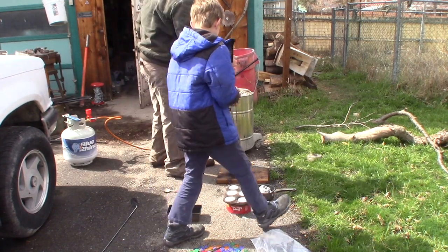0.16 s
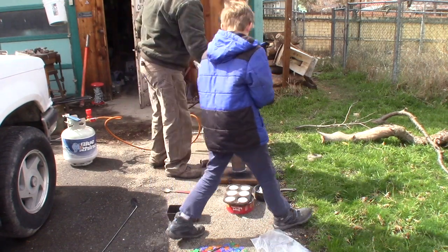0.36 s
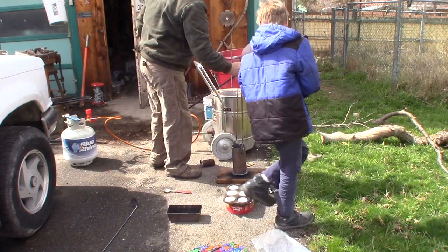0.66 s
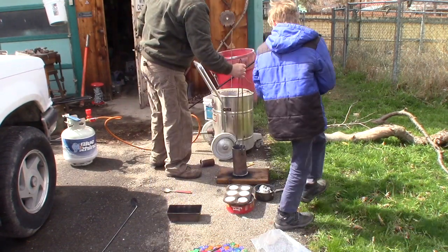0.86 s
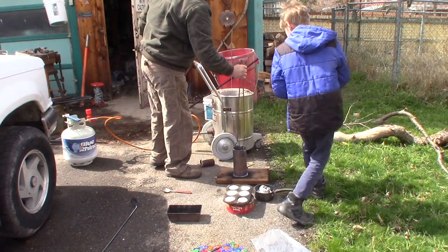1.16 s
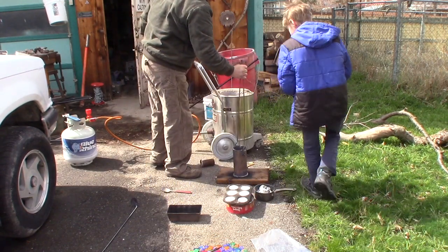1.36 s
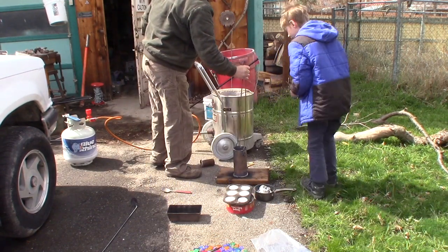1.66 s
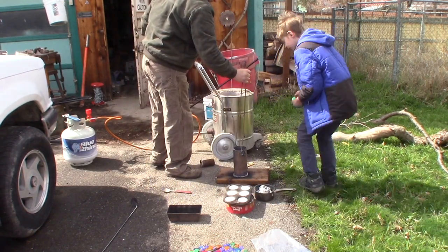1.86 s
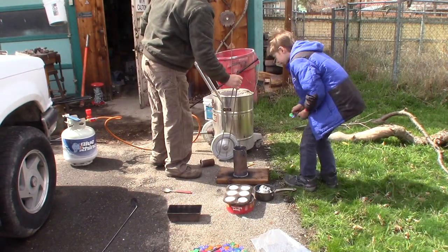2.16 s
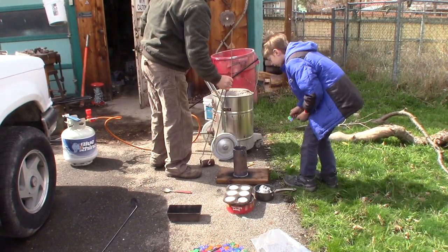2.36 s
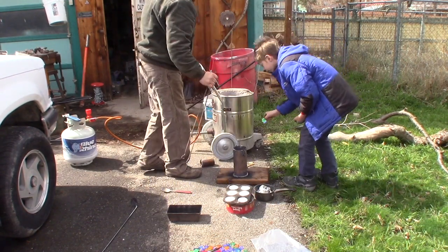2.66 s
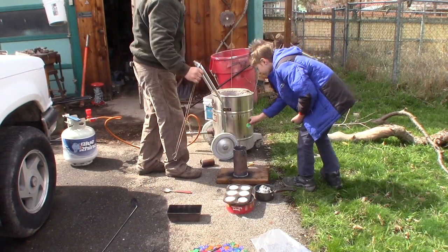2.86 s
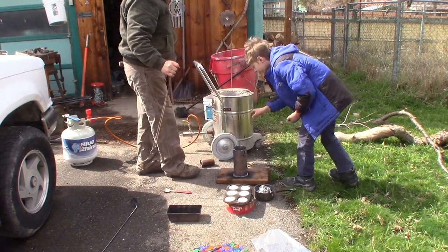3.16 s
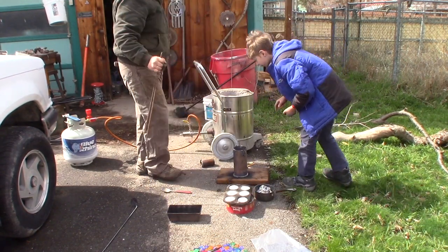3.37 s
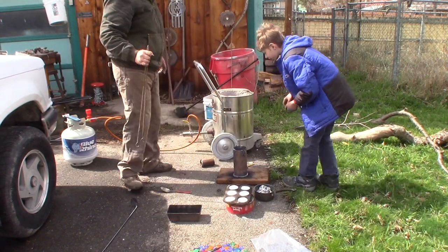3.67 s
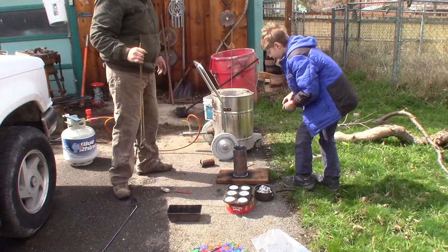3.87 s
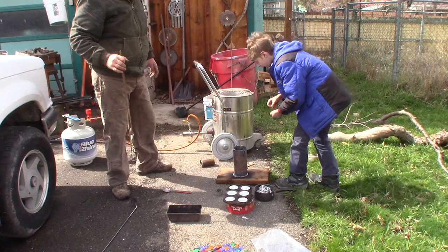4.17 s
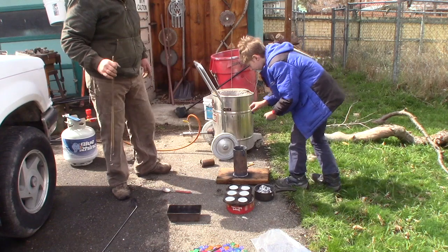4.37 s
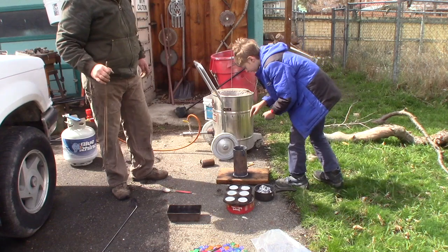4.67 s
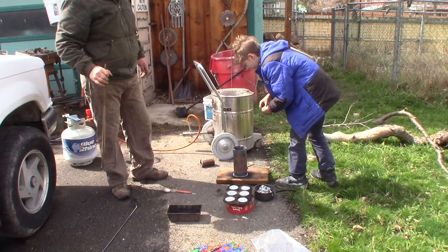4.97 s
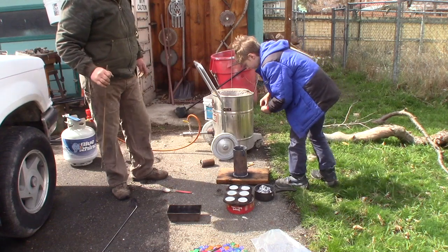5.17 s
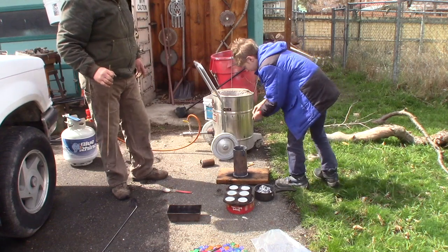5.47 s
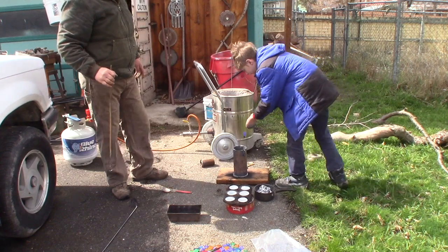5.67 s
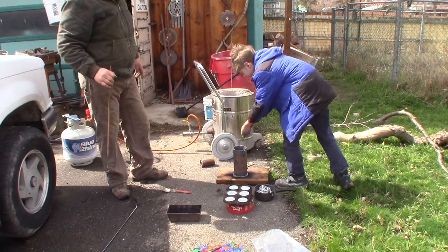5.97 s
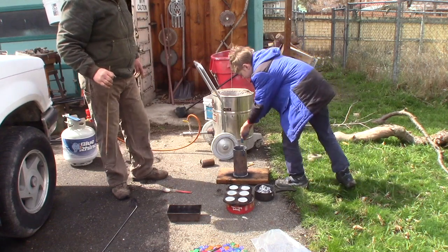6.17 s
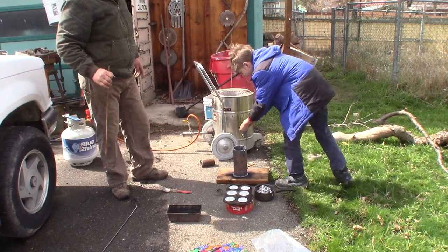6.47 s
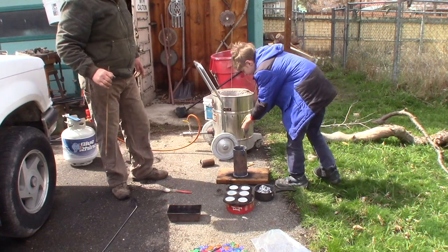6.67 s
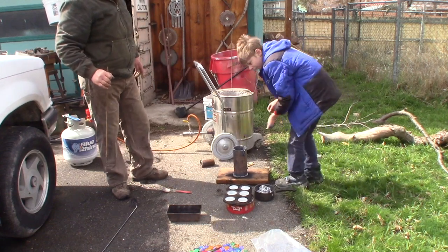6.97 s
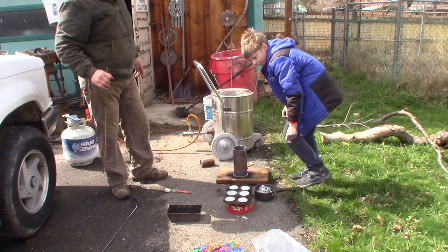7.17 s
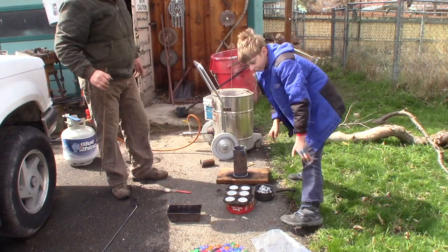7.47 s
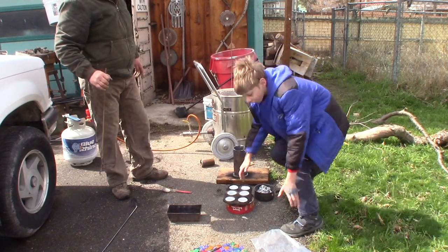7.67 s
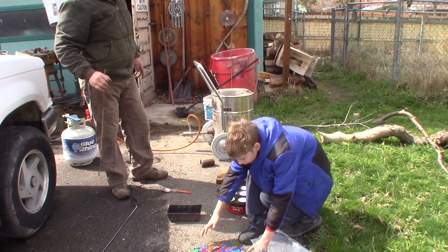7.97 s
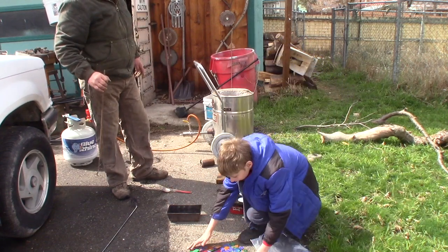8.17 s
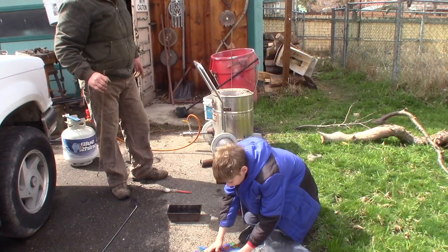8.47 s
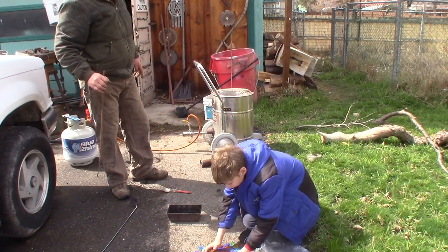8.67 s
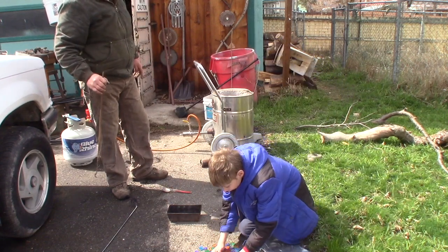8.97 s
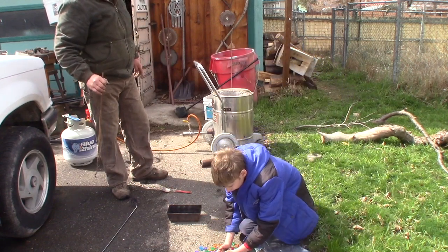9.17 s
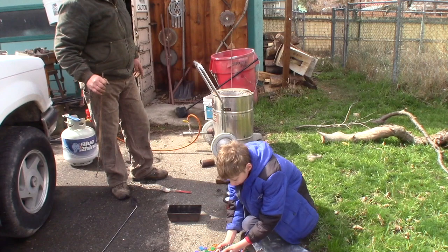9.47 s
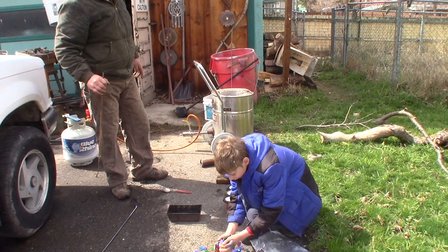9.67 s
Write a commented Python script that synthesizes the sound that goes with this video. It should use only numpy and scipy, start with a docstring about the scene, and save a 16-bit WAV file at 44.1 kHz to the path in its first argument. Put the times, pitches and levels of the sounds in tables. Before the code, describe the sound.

A gas furnace roars low and steady outdoors while shoes scuff, a tin is knocked, and a hand rummages through jingling metal scraps.

```python
"""A steady roar is heard first: turbulent gas burning in a small melting furnace in a yard, coloured by
the resonances of the drum. Nearby, shoes and a jacket scuff by friction, and small metal scraps clink
as impacts excite their modes. A baking tin is knocked and dragged. Finally a hand rummages through
a heap of scraps close by, so loudly that an automatic gain control turns the whole sound down."""
import sys
import numpy as np
from scipy import signal
from scipy.fft import rfft, irfft, next_fast_len
from scipy.io import wavfile
from scipy.ndimage import uniform_filter1d

SR = 44100
rng = np.random.default_rng(int(sys.argv[2]) if len(sys.argv) > 2 else 0)


def transcribe(u):
    """Save the signal u as a 16-bit wav file named by the first command-line argument.

    u: samples, shape (n,) or (channels, n), limited to [-1, 1]; the rate is SR.
    q: integer samples, one column per channel.
    """
    v = np.clip(np.atleast_2d(u).T, -1, 1)
    q = np.round(v * 32767).astype(np.int16)
    wavfile.write(sys.argv[1], SR, q)


N = 432641


def flame():
    """Combustion noise: turbulent burning radiates a broad roar, filtered by the furnace cavity."""
    # spectrum of the roar: f/Hz, density/dB
    roar = [(15, -89), (25, -64), (52, -31), (123, -4.5), (242, -0.5), (354, -13), (394, -11), (439, -15.5),
            (863, -22), (1040, -31), (1840, -37.5), (2280, -39), (4740, -44), (8360, -48), (16000, -61)]
    # drum resonances and gas-jet whistles: f/Hz, width/Hz, lift/dB (negative: a notch between modes)
    resonances = [(67, 10, 7.5), (202, 10, 6), (218, 7, 4), (231, 7, -9), (248, 11, 8.5), (277, 12, 4),
                  (297, 7, -4), (307, 6, 7), (328, 24, 3), (375, 10, 3), (409, 7, 8), (420, 7, -5),
                  (467, 6, -4), (478, 6, 7), (540, 14, 3), (605, 44, 2), (841, 13, -3), (958, 26, 4.5),
                  (1356, 103, 6), (2370, 230, 4), (3235, 110, 5), (3750, 105, 7.5), (7400, 270, 7),
                  (8560, 150, 6), (12700, 450, 6)]
    # likeness of left and right: f/Hz, coherence
    coherence = [(60, 0.97), (180, 1), (550, 1), (1650, 0.91), (4970, 0.95), (15000, 1)]
    # balance: f/Hz, left minus right/dB
    balance = [(60, 1.5), (180, 1.4), (550, 1.6), (1650, 1.0), (4970, 0.46), (15000, 0.5)]
    # slow swell of the roar around 500 Hz: t/s, level/dB
    swell = [(0, 0), (1.2, -0.5), (2.1, 1), (2.8, 2), (3.6, 2.5), (4.4, 0), (5.6, -1.5), (7, -0.5)]
    rms_db, hop = -23.5, 2048
    frames, hz = N // hop + 5, np.fft.rfftfreq(4 * hop, 1 / SR)
    left_re, left_im, other_re, other_im, patches, flicker = rng.standard_normal((frames, len(hz), 6)).T
    patches = evened(uniform_filter1d(uniform_filter1d(patches, 12, 0), 7, 1))  # narrow bands linger
    flicker = evened(uniform_filter1d(flicker, 1200, 0))
    waver = evened(uniform_filter1d(uniform_filter1d(left_re, 80, 0), 8, 1))  # resonances come and go
    middle = np.exp(-np.log2((hz + 1) / 500) ** 2)[:, None]
    swell_db = middle * np.interp(np.arange(frames) * hop / SR, *np.transpose(swell))
    lift_db = sum(db / (1 + (2 * (hz - f) / width) ** 2) for f, width, db in resonances)[:, None]
    level_db = read(roar, hz)[:, None] + lift_db * (1 + .15 * waver)
    level_db += .8 * patches + .25 * flicker + swell_db
    alike, lean = read(coherence, hz)[:, None], amp(read(balance, hz) / 2)[:, None]
    left = left_re + 1j * left_im
    right = alike * left + np.sqrt(1 - alike ** 2) * (other_re + 1j * other_im)
    spectra = np.array([left * lean, right / lean]) * amp(level_db)
    return amp(rms_db) * evened(signal.istft(spectra, nperseg=4 * hop, noverlap=3 * hop)[1][:, :N])


def scraps():
    """Impact noise: dense collisions in a stirred heap merge into a rattle; some pieces ring out."""
    # modes of the scraps: f/Hz, width/Hz, level/dB
    modes = [(3610, 30, -7), (3780, 30, -6), (4245, 14, -2), (4500, 8, -6), (5000, 10, -8), (5640, 7, 1),
             (6330, 10, -6), (7000, 14, -4), (7165, 14, -4), (7680, 9, 0), (9190, 11, -6), (9450, 14, -5),
             (10320, 10, 0), (11300, 14, -6), (12100, 8, -5), (13300, 16, -9), (15400, 14, -12)]
    # strikes: t/s, crack/dB, first and second ringing pitch f/Hz, ring/dB, factor of damping by the hand
    clinks = [(3.2288, -22, 5640, 7680, -35, 3.4), (5.609, -33, 5640, 5640, -46, 0.62),
              (5.65, -33, 12100, 7680, -41, 0.71), (5.689, -28.5, 5640, 10300, -46, 1),
              (6.148, -24, 5640, 11300, -28, 3.6), (6.208, -42, 4540, 7680, -28, 0.59),
              (6.222, -40, 9250, 5641, -30, 0.6), (6.238, -36, 11300, 5000, -31, .8),
              (6.349, -12, 11300, 7560, -17, 3), (6.351, -30, 3780, 3780, -21, 1.4),
              (6.363, -17, 7680, 3780, -19, 1), (6.377, -18, 3780, 3610, -13, 1.1),
              (6.384, -6, 3800, 10300, -10, 2.6), (6.43, -30, 5641, 5641, -34, 1.5),
              (6.455, -6, 12100, 5641, -22, 2.5), (6.481, -3.5, 7680, 5641, -13.5, 1.8),
              (6.483, -34, 12100, 12100, -23, 2), (6.546, -26, 3610, 5640, -38, 1.7),
              (6.615, -40, 7770, 5640, -36, 2.5), (6.678, -19, 5641, 7680, -13, 4.2),
              (6.715, -29, 10350, 12100, -29, 1.6), (6.730, -17, 10300, 10300, -14, 2.1),
              (8.136, -13, 7440, 10300, -33, 4.2), (8.1506, -19, 7680, 7680, -35, 3),
              (8.197, -18, 7680, 10300, -13, 3.4), (8.225, -22, 10300, 10240, -13, 1.5),
              (8.263, -8, 7710, 10300, -14, 2), (8.3856, -8, 7680, 10350, -14, 2.4),
              (8.57, -16, 7680, 5641, -13, 1.4), (8.685, -12, 7200, 7200, 2, 2.9),
              (8.75, 1, 4245, 7680, -5, 4.7), (8.794, 1, 13300, 4245, -2.5, 3.3),
              (8.81, -18, 9450, 11300, 1, 1.9), (8.861, 3, 7680, 10300, -3, 3.8),
              (8.91, -5, 7000, 10300, -10, 2), (8.933, 5, 7680, 9190, -8, 3),
              (8.98, 6.5, 10400, 7100, -8, 3.5), (9.028, -6, 10300, 7680, -8, 2),
              (9.196, 9.5, 7600, 9000, -4, 1.7), (9.371, -7, 7000, 7680, -11, 3),
              (9.418, 0, 10300, 10300, -10, 3.1), (9.455, -2, 7680, 10570, -3, 2.2),
              (9.495, -24, 7680, 5641, -12, 1.6), (9.563, -15.5, 6750, 10300, -5, 6.4),
              (9.64, -13, 6900, 10300, -7, 2.6), (9.653, -17.5, 10320, 5641, -14, 0.83),
              (9.672, -15, 7680, 10300, -2.5, 1.63), (9.71, -31, 6230, 10400, 1.5, 4.7),
              (9.7875, -8, 7680, 5641, -8.5, 1.5)]
    # hand strokes: peak t/s, level/dB, swell/s, fade/s, relative level of heavier pieces/dB
    stirs = [(6.15, -34.5, 0.053, 0.057, -8), (6.24, -31.5, 0.1, 0.063, -32),
             (6.39, -23.5, 0.034, 0.067, -2), (6.5, -41, 0.034, 0.076, -5), (6.68, -26, 0.0026, 0.015, -8),
             (6.732, -29.5, 0.021, 0.03, -4), (8.28, -24, 0.17, 0.26, -7), (8.44, -12, 0.13, 0.48, -9),
             (8.57, -7.5, 0.16, 0.15, -18), (8.68, -13.5, 0.082, 0.045, -12),
             (8.81, -14, 0.16, 0.14, -16.5), (8.98, -10.5, 0.18, 0.23, -10.5),
             (9.2, -9.5, 0.12, 0.13, -8.5), (9.33, -16.5, 0.11, 0.25, -8.5), (9.46, -16, 0.06, 0.15, -10),
             (9.56, -23.5, 0.097, 0.087, -7.5), (9.69, -18, 0.14, 0.11, -20), (9.8, -12, 0.009, .05, -25)]
    # light pieces rattling, with the microphone's colouring in the top treble: f/Hz, density/dB
    rattle = [(2060, -25), (3500, -16), (5300, -9), (6100, -6), (7400, 0), (8200, -4), (10300, -2),
              (12000, -10), (13600, -19), (14600, -24), (15600, -21), (16500, -24)]
    # spectrum of heavier pieces sliding: f/Hz, density/dB
    slide = [(470, -47), (800, -14), (846, -24), (987, -15), (1810, -15.5), (5280, -4), (5500, -9.5),
             (7150, -43), (12100, -120)]
    slips = amp(2.2 * evened(uniform_filter1d(rng.standard_normal(N), 300)))  # contacts come in bunches
    stir = strokes(stirs)
    heavy = strokes([(s, db + heavy_db, swell, fade) for s, db, swell, fade, heavy_db in stirs])
    out = stir * slips * coloured(crackle(per_s=2000, spread_db=2.2, hiss=.6), rattle)
    out += heavy * slips * coloured(crackle(per_s=1500, spread_db=2.4, hiss=.8), slide)
    out += amp(-8) * chimes(modes, stir, per_s=45, damping=3.5)
    commonest = [(hz, width, db) for hz, width, db in modes if db >= 0]  # touched most often
    out += amp(-11) * chimes(commonest, stir, per_s=110, damping=3)
    return out + blows(clinks, modes, t60=.017, crack_octaves=1, ring_octaves=.042,
                       second_db=2.5, floor_db=-19)


def tin():
    """Plate vibration: blows excite the tin's bending modes; dragged, it scrapes and chatters."""
    # modes of the tin: f/Hz, width/Hz, level/dB
    modes = [(409, 35, -1), (590, 40, -3), (850, 45, 0), (1000, 40, -3), (1197, 13, 2), (1553, 30, -6),
             (1810, 35, -9), (2150, 35, -6), (2770, 32, -8), (3130, 45, -8), (3880, 30, -11),
             (4180, 40, -11), (4930, 30, -12), (5110, 45, -11), (6370, 60, -14)]
    # blows: t/s, crack/dB, first and second ringing pitch f/Hz, ring/dB, damping factor
    knocks = [(7.729, -11, 940, 2140, -12.5, 0.88), (7.736, -18, 1200, 5110, -11, 0.94),
              (7.754, -27, 420, 3170, -8, 1.5), (7.767, -30, 860, 3880, -21, 1.3),
              (7.783, -19, 2770, 2770, -11, 1.1), (7.797, -8, 830, 3150, 5, 4.3),
              (7.824, -10.5, 3130, 5110, -10, 1.3), (7.889, -32, 690, 4230, -11.5, 2.2),
              (7.903, -16, 1180, 3130, -7.5, 1.2), (7.914, -9, 700, 1197, -4.5, 1),
              (7.947, -12, 494, 1553, -13.5, 2)]
    # drags over the ground: peak t/s, level/dB, swell/s, fade/s
    drags = [(7.732, -7, 0.0055, 0.15), (7.82, -11, 0.099, 0.049), (7.893, -7, .008, 0.091)]
    # spectrum of the scrape: f/Hz, density/dB
    friction = [(180, -52), (300, -0.5), (1100, -3), (1200, -26), (2350, -31), (3090, -20.5), (14000, -40)]
    drag = strokes(drags)
    scrape = amp(-8) * drag * coloured(crackle(per_s=300, spread_db=4, hiss=.5), friction)
    chatter = amp(-12) * chimes(modes, drag, per_s=130, damping=2.5)
    struck = blows(knocks, modes, t60=.03, crack_octaves=1.6, ring_octaves=.25,
                   second_db=-1.5, floor_db=-18)
    return struck + scrape + chatter


def scuffs():
    """Friction noise: rubbing cloth hisses, grit under the shoes crunches lower, single grains tick."""
    # movements of shoes and cloth: peak t/s, level/dB, length/s, relative drive of the grit/dB
    moves = [(0.036, -59, 0.092, 15.5), (0.234, -55.5, 0.14, 7.5), (0.453, -55, 0.21, 6),
             (0.76, -36.5, .11, -6.5), (1.193, -54.5, 0.54, -2), (1.653, -51, .14, -6), (1.84, -51, 0.4, 4),
             (1.909, -41.5, 0.046, 3), (2.026, -43.5, 0.066, -3.5), (3.234, -43, 0.06, -3),
             (3.485, -49.5, 0.25, 2.5), (3.87, -55.5, 0.55, 0.5), (4.103, -46.5, 0.19, -25),
             (5.958, -49, 0.22, -30), (6.99, -53.5, 0.83, -5), (7.613, -44.5, 0.37, -13)]
    # spectrum of rubbing cloth: f/Hz, density/dB
    cloth = [(1470, -25), (2500, -7), (4910, -13), (6350, -11), (6920, -10), (10200, -15.5), (16000, -43)]
    # spectrum of crunching grit: f/Hz, density/dB
    grit = [(350, -30), (600, 9), (1720, -1), (1940, -17), (2890, -14), (4000, -7), (5200, -26),
            (8800, -120)]
    # dry ticks of grit and tools: t/s, level/dB, f/Hz, thud/dB
    ticks = [(0.0225, -35, 2320, -33), (0.0862, -21.5, 6900, -34), (0.2998, -22, 1990, -48),
             (0.843, -30, 4000, -43), (1.068, -34, 3000, -38), (1.1328, -32.5, 4650, -35),
             (1.2286, -32, 4200, -43), (1.527, -35, 6500, -45), (1.8724, -23.5, 4300, -40),
             (1.8946, -22, 3250, -18), (2.0198, -31, 4760, -35), (2.068, -36, 3000, -30),
             (2.768, -33, 2490, -25), (3.7314, -31, 6100, -39), (3.861, -27, 6500, -34),
             (4.6032, -26.5, 2500, -12), (4.617, -32, 3710, -18), (4.6514, -30.5, 2300, -37),
             (4.6952, -13.5, 6100, -27), (4.716, -21, 7460, -48), (5.1071, -23.5, 8240, -45),
             (5.219, -27, 8190, -40), (5.432, -30, 8450, -45), (5.8439, -22, 4340, -26),
             (5.9229, -13, 7850, -20.5), (6.349, -17.5, 3880, -38), (6.3824, -15, 3900, -8.5),
             (6.714, -9.5, 4900, -25), (7.5646, -43, 5260, -18), (7.58, -28, 2260, -17.5),
             (8.0352, -16, 2440, -25), (8.083, -22, 6940, -27)]
    rub, crunch = np.zeros((2, N + SR))  # a second of lead lets a stroke begin before t = 0
    for s, db, length, grit_db in moves:
        stroke = amp(db) * np.hanning(round(length * SR))
        add(rub, s + 1 - length / 2, stroke)
        add(crunch, s + 1 - length / 2, amp(grit_db) * stroke)
    rub, crunch = rub[SR:], crunch[SR:]
    out = rub * coloured(crackle(per_s=1100, spread_db=3.8, hiss=1), cloth)
    out += amp(2) * crunch * coloured(crackle(per_s=900, spread_db=1.2, hiss=1.5), grit)
    pebbles = [(hz, 95, 0) for hz in np.geomspace(1500, 7700, 24)]  # each size rings at its own pitch
    out += amp(3) * chimes(pebbles, crunch, per_s=40, damping=.87)
    for (s, db, hz, thud_db), noise in zip(ticks, rng.standard_normal((len(ticks), 3000))):
        add(out, s, amp(db) * crack(noise, hz, t60=.031, octaves=1.04))
        add(out, s, amp(thud_db) * crack(noise, hz=620, t60=.031, octaves=1.5))
    return out


def blows(events, modes, t60, crack_octaves, ring_octaves, second_db, floor_db):
    """Impact: a snap at first contact and a broad crack, then the free vibration of the object."""
    out = np.zeros(N)
    for s, db, first_hz, second_hz, ring_db, damping in events:
        noise, centre_hz = rng.standard_normal(3000), np.sqrt(first_hz * second_hz)
        snap = crack(noise[::-1], centre_hz, t60=.0031, octaves=crack_octaves)
        add(out, s, amp(db + .5) * snap)
        add(out, s, amp(db) * crack(noise, centre_hz, t60, crack_octaves))
        ringing = ring(noise, modes, first_hz, second_hz, damping, ring_octaves, second_db, floor_db)
        add(out, s, amp(ring_db) * ringing)
    return out


def ring(noise, modes, first_hz, second_hz, damping, octaves, second_db, floor_db):
    """Modal decay: damped sinusoids, strongest near two pitches set by where the object is struck."""
    flutter_db, flutter_per_s = 2, 163  # a ringing piece keeps touching its neighbours
    hz, width, db = np.transpose(modes)[:, :, None]
    t = np.arange(round(.3 * SR)) / SR
    first = amp(-6 * (np.log2(hz / first_hz) / octaves) ** 2)
    second = amp(second_db - 12 * (np.log2(hz / second_hz) / octaves) ** 2)
    offsets = np.arange(len(hz))[:, None] * len(noise) // len(hz)  # each mode flutters on its own
    flutter = np.interp(t * flutter_per_s + offsets, np.arange(len(noise)), noise)
    strength = amp(db + flutter_db * flutter) * (first + second + amp(floor_db))
    out = (strength * np.exp(-np.pi * damping * width * t) * np.sin(2 * np.pi * hz * t)).sum(0)
    out *= np.minimum(t / .0018, 1)
    return out / abs(out).max()


def crack(noise, hz, t60, octaves):
    """Contact transient: a brief force has a wide spectrum, here a decaying band of noise."""
    band_hz = [hz / 2 ** octaves, min(hz * 2 ** octaves, 10800)]
    burst = signal.sosfilt(signal.butter(4, band_hz, "bandpass", fs=SR, output="sos"), noise)[200:]
    t = np.arange(len(burst)) / SR
    rise = np.minimum(t / .0004, 1)
    return burst * rise * amp(-60 * t / t60) / (1.77 * np.std(burst))  # peak near 1


def chimes(modes, drive, per_s, damping):
    """Impulse response: each mode is a damped resonator rung by its own sparse, light contacts."""
    start, out = np.argmax(drive > 0), np.zeros(N)
    for hz, width, db in modes:
        strikes = rng.standard_normal(N - start) * (rng.random(N - start) < per_s / SR) * drive[start:]
        radius, turn = np.exp(-np.pi * damping * width / SR), 2 * np.pi * hz / SR
        poles = [1, -2 * radius * np.cos(turn), radius ** 2]
        out[start:] += amp(db) * signal.lfilter([0, np.sin(turn)], poles, strikes)
    return out


def crackle(per_s, spread_db, hiss):
    """Shot noise: random contacts, many faint and a few strong, over a smooth share of hiss."""
    sizes = amp(spread_db * np.minimum(rng.exponential(1, N), 4)) * (rng.random(N) < per_s / SR)
    puffs = signal.lfilter([1], [1, -.97], sizes)  # each contact lasts about a millisecond
    return (evened(puffs) + hiss) * rng.standard_normal(N)


def strokes(rows):
    """Incoherent addition: the powers of swelling and fading strokes sum to one envelope."""
    drop_db = 20  # reached one swell before the peak and one fade after it
    power = np.zeros(N)
    for s, db, swell, fade, *_ in rows:
        t = np.arange(-2 * swell, 2 * fade, 1 / SR)
        arch = (t / np.where(t < 0, swell, fade)) ** 2
        add(power, s + t[0], amp(db - drop_db * arch) ** 2)
    return np.sqrt(power)


def yard(x):
    """Early reflections from a shed wall and a truck: one part alike at both ears, one opposed."""
    # stereo width: f/Hz, gain of the opposed part/dB
    width = [(60, -18), (150, -21), (380, -21), (950, -30), (2380, -59), (4500, -73), (8000, -27.5),
             (15000, -17.5)]
    t60, t = .12, np.arange(4096) / SR
    taps = rng.standard_normal((2, len(t))) * (rng.random((2, len(t))) < .05)
    taps *= amp(-60 * t / t60) * (t > .002)
    taps /= np.linalg.norm(taps, axis=1)[:, None]
    opposed = irfft(rfft(taps[1]) * amp(read(width, np.fft.rfftfreq(len(t), 1 / SR))))
    response = amp(-9) * taps[0] + np.array([opposed, -opposed])
    return signal.oaconvolve(x[None], response, axes=1)[:, :N]


def coloured(x, spectrum):
    """Spectral shaping: gives a flat signal the spectrum, at rms 1."""
    size = next_fast_len(len(x))
    gain = amp(read(spectrum, np.fft.rfftfreq(size, 1 / SR)))
    return evened(irfft(rfft(x, size) * gain, size)[:len(x)])


def amp(db):
    """Amplitude ratio of a level."""
    return 10 ** (np.asarray(db) / 20)


def evened(x):
    """Normalisation to rms 1."""
    return x / np.sqrt(np.mean(x ** 2) + 1e-20)


def read(points, hz):
    """Interpolation over logarithmic frequency."""
    f, value = np.transpose(points)
    return np.interp(np.log(hz + 1), np.log(f + 1), value)


def add(mix, s, sound):
    """Superposition of a sound from s seconds on."""
    part = mix[round(s * SR):][:len(sound)]
    part += sound[:len(part)]


def scene():
    """Superposition of the roar, nearby sounds placed by level difference, and their reflections."""
    steps, metal, pan = scuffs(), scraps(), tin()
    # left minus right/dB for scuffs, scraps and tin
    balance = [.9, .35, 1.1]
    placed = sum(x * amp([[db / 2], [-db / 2]]) for x, db in zip((steps, metal, pan), balance))
    return flame() + placed + yard(steps + metal + pan)


def record(dry):
    """Compression between a low cut and a band limit: gain falls fast on loud sound, recovers slowly."""
    hop, threshold_db, slope, attack_share, recover_db_per_s = 256, -13.5, .42, .66, 8
    low_cut_hz, band_limit_hz = 45, 15900
    dry = signal.sosfilt(signal.butter(2, low_cut_hz, "highpass", fs=SR, output="sos"), dry)
    peaks = abs(dry[:, :N // hop * hop]).reshape(2, -1, hop).max((0, 2))
    excess_db = np.maximum(20 * np.log10(peaks + 1e-9) - threshold_db, 0)
    cut_db = [0.]
    for wanted in slope * excess_db:
        last = cut_db[-1]
        if wanted > last:
            cut_db.append(last + attack_share * (wanted - last))
        else:
            cut_db.append(max(last - recover_db_per_s * hop / SR, 0))
    ducked = dry / amp(np.interp(np.arange(N), np.arange(len(cut_db)) * hop, cut_db))
    rounded = np.tanh(ducked)  # the input stage rounds off the highest peaks
    lowpass = signal.firwin(511, band_limit_hz, window=("kaiser", 9), fs=SR)
    return signal.oaconvolve(rounded, lowpass[None], "same")


dry = scene()
out = record(dry)
transcribe(out)
```